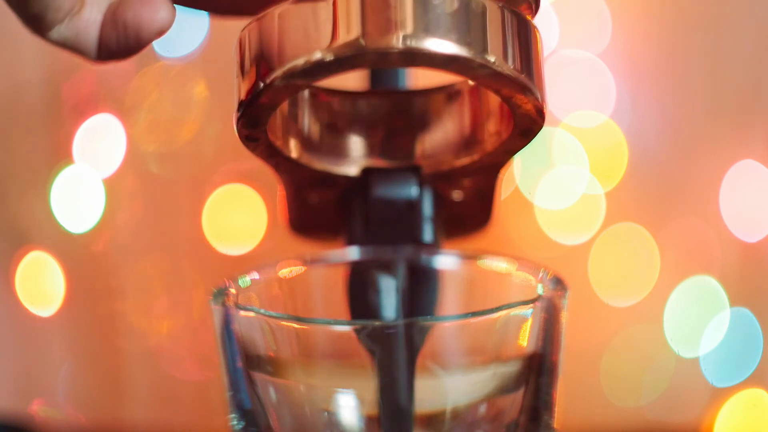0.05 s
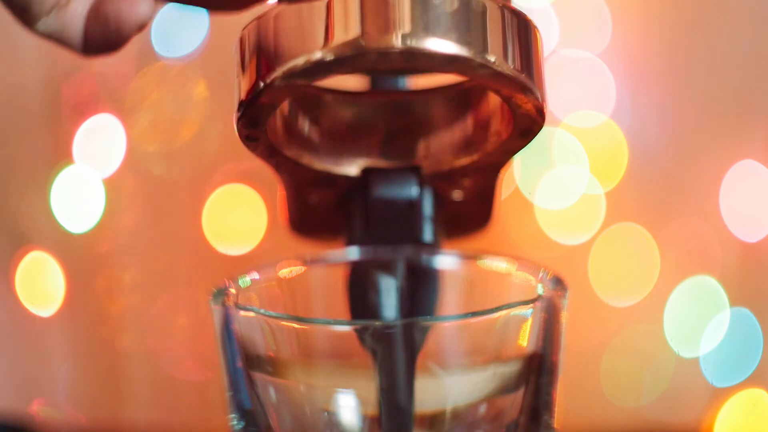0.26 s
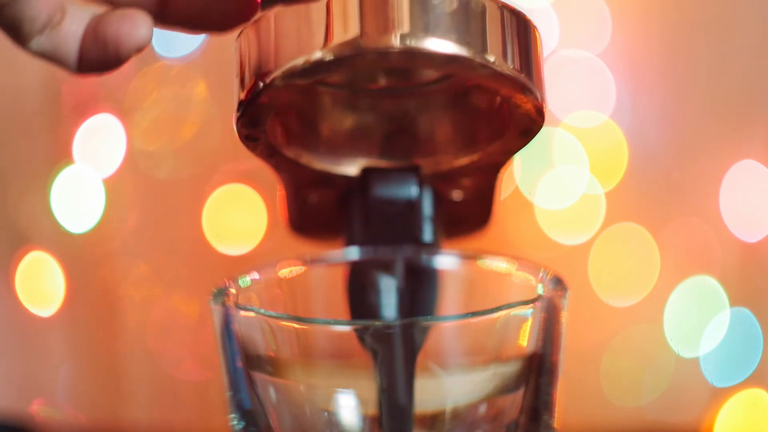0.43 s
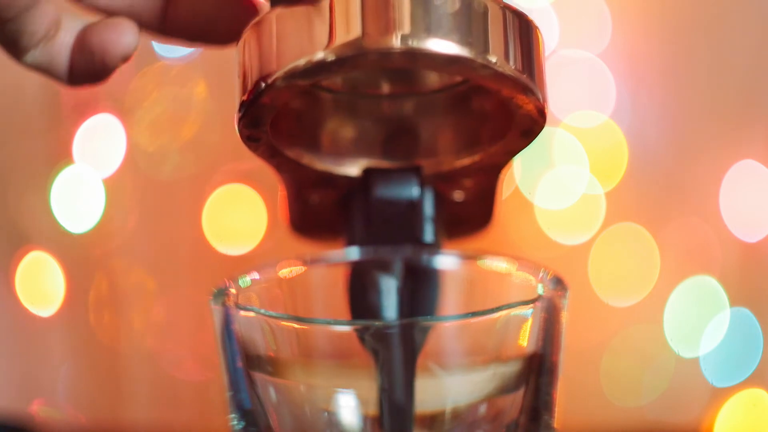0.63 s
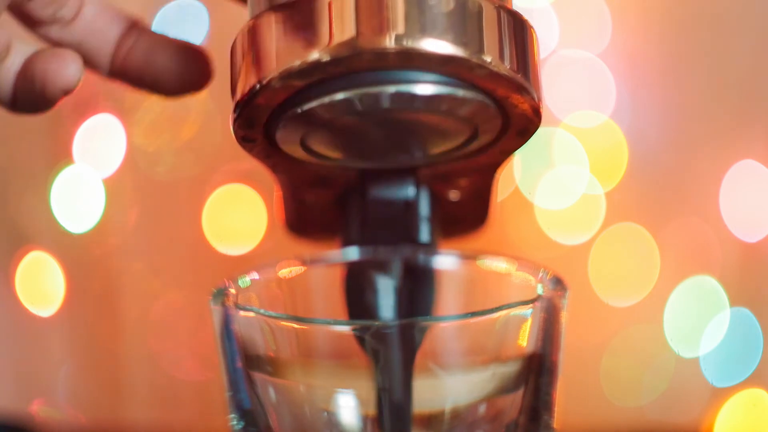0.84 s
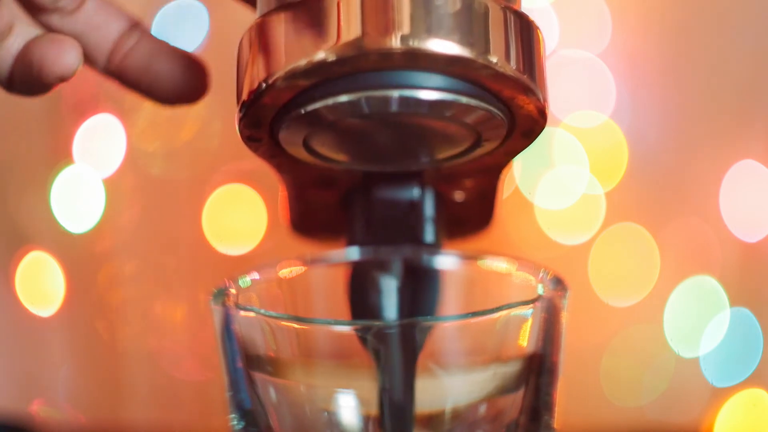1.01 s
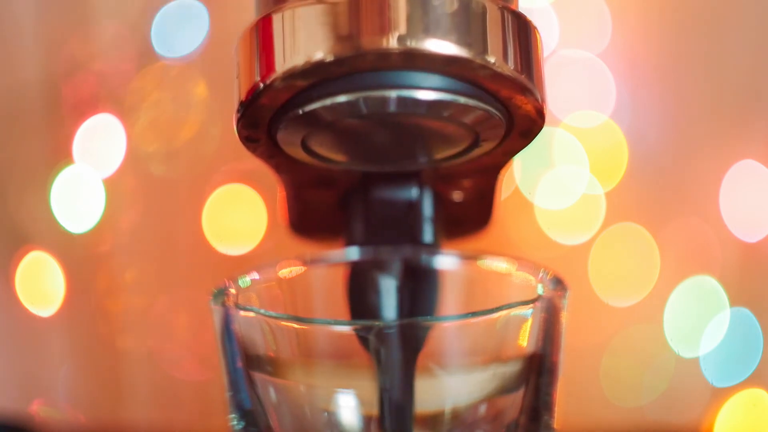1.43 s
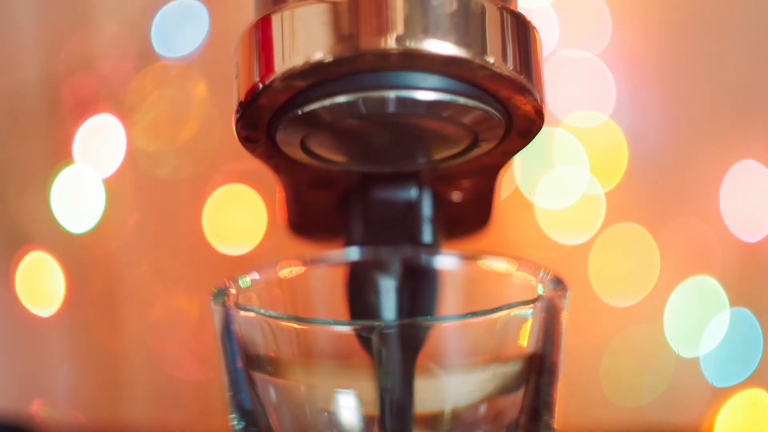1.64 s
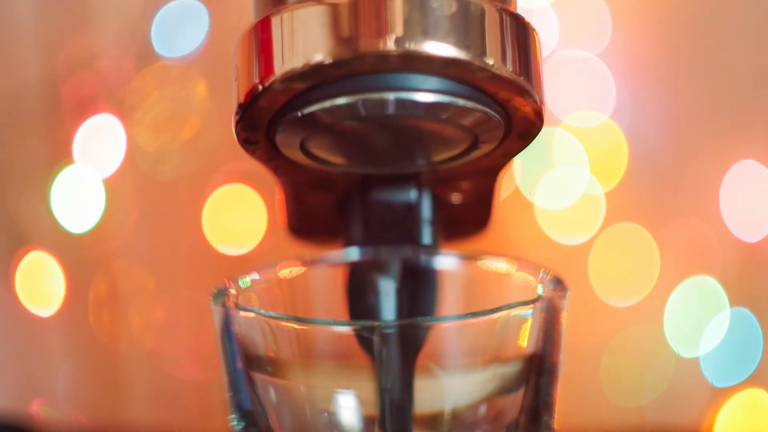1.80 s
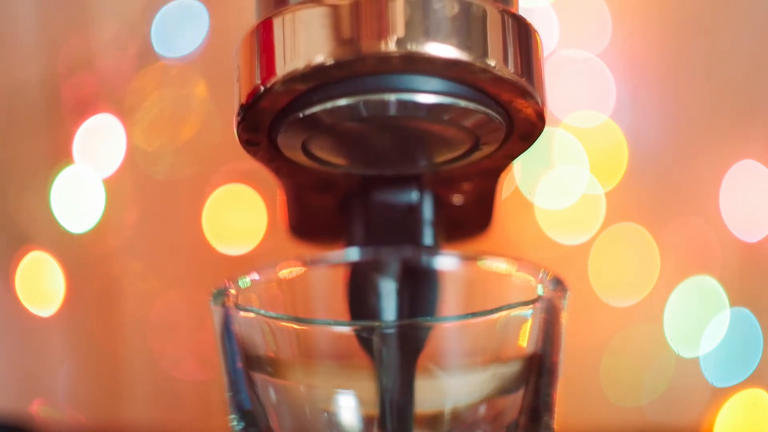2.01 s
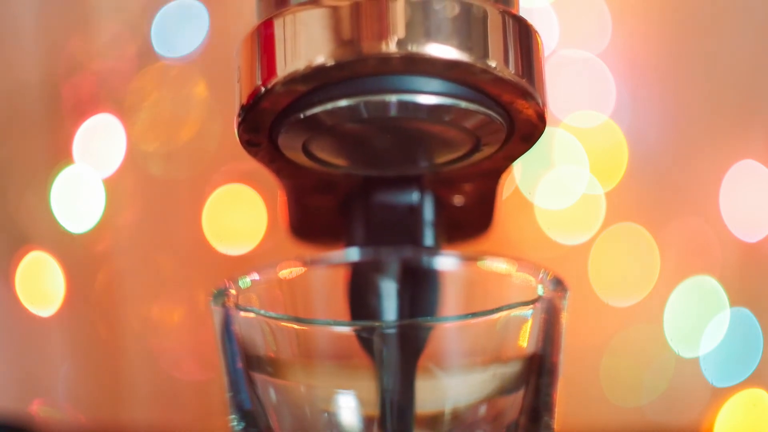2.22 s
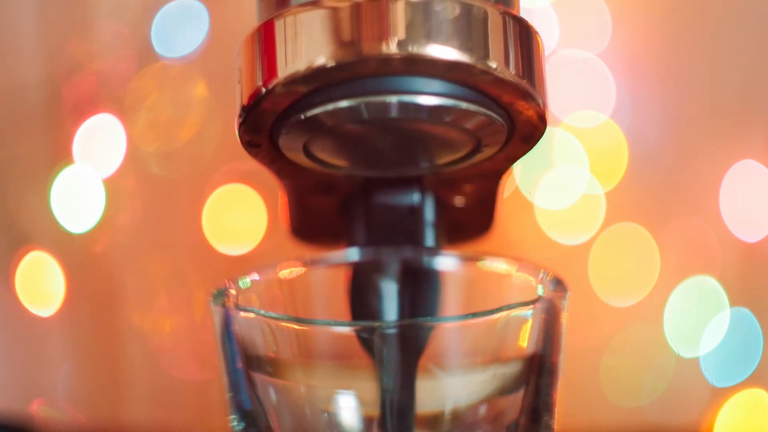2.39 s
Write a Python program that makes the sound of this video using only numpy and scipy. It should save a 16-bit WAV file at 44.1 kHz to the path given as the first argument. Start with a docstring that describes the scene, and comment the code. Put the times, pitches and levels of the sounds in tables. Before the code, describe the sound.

A thin steel coffee basket clinks, scrapes and snaps into its metal holder, close by.

```python
"""In a quiet room, close by, a thin steel filter basket is pushed into a coffee filter holder's ring.
Each impact excites damped modes: the loose basket knocks and rings, and the holder thuds. Sliding
friction makes the steel chatter and, by stick-slip, squeak. The basket jams with a clang, its floor
flexes with a hollow pop, and it snaps home with dry clicks. The room reverberates and hums faintly."""
import sys
import numpy as np
from scipy import signal
from scipy.fft import rfft, irfft
from scipy.io import wavfile
from scipy.ndimage import uniform_filter1d, minimum_filter1d

SR = 44100
rng = np.random.default_rng(int(sys.argv[2]) if len(sys.argv) > 2 else 0)


def generate_wav(signal):
    """Clip the signal to [-1, 1] and save it as 16-bit WAV at the path in sys.argv[1]."""
    frames = np.transpose(np.atleast_2d(signal))
    scaled = np.clip(frames, -1, 1) * 32767
    pcm = np.round(scaled).astype(np.int16)
    wavfile.write(sys.argv[1], SR, pcm)


N = 112454
T = np.arange(SR * 3 // 4) / SR  # time axis of one event [s]
FILTER_HZ = np.fft.rfftfreq(4096, 1 / SR)

# normal modes of the basket: (frequency [Hz], level [dB], T60 [s])
BASKET_MODES = [(720, -3, 0.25), (1130, -1, 0.3), (1667, -2, 0.17), (2065, -15, 0.22), (2516, -2, 0.17),
                (2755, -2.5, 0.24), (3140, -13, 0.3), (4424, 6, 0.24), (9292, -5, 0.26), (9810, -3, 0.19)]
# spectrum of a loose contact: (frequency [Hz], relative level [dB])
LOOSE_SPECTRUM = [(50, -23), (220, -13.5), (700, -10), (1100, -2), (2300, 1), (4000, 1.5), (5500, -2),
                  (7000, -4), (8000, -10.5), (9900, -7.5), (11500, -25), (15000, -34.5)]
CRACK_S, CLINK_RISE_S = 0.0022, 0.0013


def amp(db):
    """Amplitude ratio of a level in decibels."""
    return 10 ** (np.asarray(db) / 20)


def unit_rms(x):
    """Normalisation to an rms of 1."""
    return x / np.sqrt(np.mean(x ** 2) + 1e-20)


def curve(points, hz):
    """Interpolation on a logarithmic frequency axis."""
    point_hz, value = np.transpose(points)
    return np.interp(np.log(hz + 1), np.log(point_hz), value)


def add(mix, start_s, sound):
    """Superposition of a sound on the mix from a given time."""
    part = mix[round(start_s * SR):][:len(sound)]
    part += sound[:len(part)]


def tilt(hz, low_db, treble_db):
    """Shelving: the gain [dB] that a contact gives each end of the spectrum."""
    return curve([(1100, low_db), (3000, 0), (5200, 0), (9000, treble_db)], hz)


def resonances(centres_hz, half_width_hz):
    """A sum of Lorentzian resonance curves, each of height 1."""
    return sum(1 / (1 + ((FILTER_HZ - hz) / half_width_hz) ** 2) for hz in centres_hz)


def colour(x, spectrum, low_db, treble_db, peaks_db=0):
    """Minimum-phase filtering, at unit energy, by a spectrum with shelves and resonance peaks."""
    db = curve(spectrum, FILTER_HZ) + peaks_db + tilt(FILTER_HZ, low_db, treble_db)
    log_gain = np.log(amp(np.r_[db, db[-2:0:-1]]))
    response = np.exp(np.conj(signal.hilbert(log_gain)))
    taps = np.fft.ifft(response).real[:len(FILTER_HZ)]
    return signal.fftconvolve(x, taps / np.linalg.norm(taps))[:len(x)]


def burst(envelope):
    """Spectral whitening makes a noise transient with a nearly flat spectrum."""
    x = envelope * rng.standard_normal(len(T))
    for _ in range(2):
        spectrum = rfft(x)
        x = irfft(spectrum / (abs(spectrum) + 1e-12), len(T)) * np.sqrt(envelope)
    return x * np.linalg.norm(envelope) / np.linalg.norm(x)


def room_tone(hiss_db=-49.5, hum_db=-66.5, hum_hz=99, waver=0.12):
    """Ambient noise: partly coherent hiss, and a hum slowly modulated in amplitude and phase."""
    # spectrum of the hiss: (frequency [Hz], relative spectral density [dB])
    hiss_spectrum = [(60, -30), (110, -10), (230, -8.5), (720, -14.5), (880, -19), (8000, -36.5),
                     (9400, -29.5), (11500, -41.5), (15500, -52)]
    # likeness of the hiss at left and right: (frequency [Hz], correlation [-1 to 1])
    hiss_correlation = [(60, 0.32), (250, -0.83), (9000, 0.54)]
    hz = np.fft.rfftfreq(N, 1 / SR)
    left, independent = rfft(rng.standard_normal((2, N))) * amp(curve(hiss_spectrum, hz))
    correlation = np.clip(curve(hiss_correlation, hz), -1, 1)
    right = correlation * left + np.sqrt(1 - correlation ** 2) * independent
    hiss = unit_rms(irfft(np.array([left, right]), N))
    swell, drift = unit_rms(irfft(rfft(rng.standard_normal((2, N))) * (hz < 6), N))
    phase = 2 * np.pi * hum_hz * np.arange(N) / SR + waver * drift
    hum = unit_rms((1 + waver * swell) * np.sin(phase))
    return amp(hiss_db) * hiss + amp(hum_db) * hum


def crack(width_s, body_db=-22.5, body_s=0.0038):
    """Impact noise: a half-Gaussian pulse and the exponential decay of the metal's dense modes."""
    return burst(np.exp(-(T / width_s) ** 2 / 2) + amp(body_db) * np.exp(-T / body_s))


def chatter(length_s, hits_per_s=1100, grain_s=0.0008, rise_s=0.0049, fade_s=0.0086):
    """Sliding friction of metal on metal: a Poisson train of tiny uneven impacts."""
    hits = (rng.random(len(T)) < hits_per_s / SR) * rng.choice([-1, 1], len(T))
    strength_db = 7 * rng.uniform(-0.83, 1, len(T))
    grain = burst(np.exp(-T / grain_s))
    scrape = unit_rms(signal.fftconvolve(hits * amp(strength_db), grain)[:len(T)])
    return scrape * np.minimum(T / rise_s, 1) * np.exp(-np.maximum(T - length_s, 0) / fade_s)


def ring(modes, rise_s):
    """Free vibration: exponentially damped modes in random phase, with a short build-up."""
    tones = sum(amp(db - 60 * T / t60) * np.sin(2 * np.pi * (hz * T + rng.random()))
                for hz, db, t60 in modes)
    return tones * np.minimum(T / rise_s, 1)


def basket_ring(centre_hz, octaves):
    """Selective excitation: the point of contact favours the basket's modes near one frequency."""
    modes = [(hz, db - 10 * np.log10(1 + (np.log2(hz / centre_hz) / octaves) ** 4), t60)
             for hz, db, t60 in BASKET_MODES]
    return ring(modes, rise_s=0.01)


def knocks(jam_s=0.8823):
    """Impact excitation: the loose basket strikes, scrapes and jams; gives contact noise and tones."""
    # contacts with the ring: (time [s], crack [dB], chatter [dB], chatter length [s], low shelf [dB],
    # treble shelf [dB], ringing [dB], ringing centre [Hz], thud [dB])
    contacts = [(0.203, -32, -33.5, 0.041, 2.5, -7.5, -26.5, 2400, -65),
                (0.281, -33.5, -37, 0.021, 8, -6, -29, 1400, -71),
                (0.353, -7.5, -33, 0.015, 0, -0.5, -15, 2000, -31),
                (0.459, -41, -34, 0.018, 12.5, -6, -36, 1700, -46),
                (0.487, -33, -27, 0.016, 9, -9, -25, 1600, -35),
                (0.783, -34.5, -35.5, 0.023, 4.5, -7.5, -29.5, 1000, -28.5),
                (0.824, -51, -39.5, 0.079, 6, -1, -49, 1200, -32),
                (0.864, -38, -30.5, 0.056, -4, 10, -65, 3300, -26.5),
                (0.8801, -21.5, -19, 0.0065, -17.5, 6.5, -33, 1700, -27),
                (0.892, -19.5, -25.5, 0.014, 14, 16.5, -25.5, 9500, -46),
                (0.9018, -16.5, -26.5, 0.034, -3, -4, -24.5, 5000, -31)]
    # short-lived resonances of the loose basket: (frequency [Hz])
    loose_hz = [3260, 3860, 6090, 6670, 7300]
    # normal modes of the holder: (frequency [Hz], level [dB], T60 [s])
    holder_modes = [(141.7, -13, 0.28), (211, 1, 0.1), (235.3, -3, .14), (271, -5, 0.13)]
    # modes of the basket jammed against the ring's lip: (frequency [Hz], level [dB], T60 [s])
    jam_modes = [(1657, -22.5, 0.15), (2015, -15.5, 0.056), (2435, -16.5, 0.039)]
    noise, tones = np.zeros((2, N))
    basket_peaks_db = 7 * resonances([mode[0] for mode in BASKET_MODES], half_width_hz=38.2)
    loose_peaks_db = 6 * resonances(loose_hz, half_width_hz=82)
    for start_s, crack_db, chatter_db, length_s, low_db, treble_db, ring_db, hz, thud_db in contacts:
        strike = colour(crack(CRACK_S), LOOSE_SPECTRUM, low_db, treble_db, loose_peaks_db)
        scrape = colour(chatter(length_s), LOOSE_SPECTRUM, low_db, treble_db, basket_peaks_db)
        ringing = basket_ring(hz, octaves=0.32)
        thud = ring(holder_modes, rise_s=0.006)
        add(noise, start_s, amp(crack_db) * strike + amp(chatter_db) * scrape)
        add(tones, start_s, amp(ring_db) * ringing + amp(thud_db) * thud)
    add(tones, jam_s, ring(jam_modes, CLINK_RISE_S))
    return np.array([noise, tones])


def rough_note(length_s, hz, rise_s, waver=0.024, fade_s=0.0022):
    """Random frequency modulation roughens a brief tone."""
    jitter = unit_rms(uniform_filter1d(rng.standard_normal(len(T)), size=40))
    pitch_hz = hz * (1 + waver * jitter)
    envelope = np.minimum(T / rise_s, 1) * np.exp(-np.maximum(T - length_s, 0) / fade_s)
    return envelope * np.sin(2 * np.pi * np.cumsum(pitch_hz) / SR)


def squeaks():
    """Stick-slip oscillation of the steel as the basket slides down the ring."""
    # spells of stick-slip: (time [s], length [s], frequency [Hz], level [dB])
    slips = [(0.782, 0.051, 3900, -34), (0.799, 0.0032, 3926, -19.5), (0.899, 0.0042, 3610, -15.5)]
    out = np.zeros(N)
    for start_s, length_s, hz, db in slips:
        add(out, start_s, amp(db) * rough_note(length_s, hz, rise_s=0.00085))
    return out


def pops():
    """Flexure of the basket's floor excites its heavily damped modes, with a tick and a rim note."""
    # flexes of the floor: (time [s], level [dB])
    flexes = [(1.128, -11.5), (1.268, -33)]
    # normal modes of the floor: (frequency [Hz], level [dB], T60 [s])
    floor_modes = [(863, -6.5, 0.02), (979, -0.5, 0.032), (1908, -19.5, 0.03), (3446, -18, 0.031),
                   (4150, -20.5, 0.045)]
    out = np.zeros(N)
    for start_s, db in flexes:
        tick = amp(-20.5) * colour(crack(CRACK_S), LOOSE_SPECTRUM, low_db=0, treble_db=6)
        rim = amp(-23) * rim_note()
        add(out, start_s, amp(db) * (ring(floor_modes, rise_s=0.0035) + tick + rim))
    return out


def rim_note():
    """Resonance of the rim: a brief high note just after a pop or a snap."""
    return rough_note(length_s=0.0055, hz=9040, rise_s=0.0031)


def snaps(clink_t60_s=0.04):
    """Impacts on the seated basket excite strongly damped modes; gives contact noise and tones."""
    # clicks as it snaps home and settles: (time [s], crack [dB], crack width [s], low shelf [dB],
    # treble shelf [dB], clink [dB], ringing [dB])
    clicks = [(1.222, -42, 0.0034, -25, -22, -39, -48), (1.3454, -13.5, 0.0021, 6, 1, -16, -55),
              (1.3817, -20.5, 0.0042, 4, 0, -26, -51), (1.552, -37, 0.019, -6.5, 0.5, -48, -33.5),
              (1.635, -50.5, 0.011, 1, 1, -57, -47), (1.681, -53.5, 0.015, 5.5, -13, -54, -48)]
    # spectrum of a seated contact: (frequency [Hz], relative level [dB])
    seated_spectrum = [(200, -17.5), (400, -24), (880, -3), (1350, -6), (1750, 0.5), (2300, -1), (3200, 5),
                       (4900, -3), (10300, -14.5), (15000, -37)]
    # short-lived modes of the seated basket: (frequency [Hz], level [dB])
    seated_modes = [(930, -20.5), (1720, -4.5), (2820, -4), (3120, -4), (3365, -2), (3550, 0.5),
                    (4020, -5.5), (5620, -9), (7350, -4)]
    noise, tones = np.zeros((2, N))
    for start_s, crack_db, width_s, low_db, treble_db, clink_db, ring_db in clicks:
        click = colour(crack(width_s), seated_spectrum, low_db, treble_db)
        modes = [(hz, db + tilt(hz, low_db, treble_db), clink_t60_s) for hz, db in seated_modes]
        clink = ring(modes, CLINK_RISE_S)
        rim = amp(treble_db - 9.5) * rim_note()
        ringing = basket_ring(centre_hz=2780, octaves=0.09)
        add(noise, start_s, amp(crack_db) * (click + rim))
        add(tones, start_s, amp(clink_db) * clink + amp(ring_db) * ringing)
    return np.array([noise, tones])


def reverberation(x, delay_s=0.0028, early_db=-4, early_t60_s=0.13, early_per_s=2000, tail_db=-10):
    """Convolution with early reflections from the worktop and a diffuse tail that dies band by band."""
    # reverberation time of the room: (frequency [Hz], T60 [s])
    room_t60 = [(120, 1), (1200, 0.46), (3000, 0.46), (8000, 0.4)]
    # stereo width of the reflections: (frequency [Hz], side gain [ratio])
    room_width = [(250, 1.07), (800, 0.47)]
    diffuse = rng.standard_normal((2, len(T))) * (T > delay_s)
    hz, t, bands = signal.stft(diffuse, SR, nperseg=256)
    decay = amp(-60 * t / curve(room_t60, hz)[:, None])
    tail = signal.istft(bands * decay, SR, nperseg=256)[1][:, :len(T)]
    polarity = rng.choice([-1, 1], diffuse.shape)
    arrivals = (rng.random(diffuse.shape) < early_per_s / SR) * (T > delay_s)
    early = polarity * arrivals * amp(-60 * T / early_t60_s)
    response = amp(tail_db) * tail / np.linalg.norm(tail[0])
    response += amp(early_db) * early / np.linalg.norm(early[0])
    mid, side = signal.fftconvolve(x[None], response, axes=1)[:, :N]
    side = irfft(rfft(side) * curve(room_width, np.fft.rfftfreq(N, 1 / SR)), N)
    return np.array([mid + side, mid - side])


def scene(tone_send=0.66):
    """Superposition of the direct sound, its reverberation and the room's ambient noise."""
    noise, tones = knocks() + snaps()
    transients = noise + pops() + squeaks()
    return transients + tones + reverberation(transients + tone_send * tones) + room_tone()


def record(dry, ceiling=0.86, smooth_samples=45, cutoff_hz=15400):
    """Fast peak limiting, then low-pass filtering."""
    needed_gain = np.minimum(1, ceiling / (abs(dry).max(0) + 1e-9))
    gain = uniform_filter1d(minimum_filter1d(needed_gain, 2 * smooth_samples), smooth_samples)
    lowpass = signal.firwin(255, cutoff_hz, window=("kaiser", 9), fs=SR)
    return signal.oaconvolve(dry * gain, lowpass[None], "same")


dry = scene()
out = record(dry)
generate_wav(out)
```